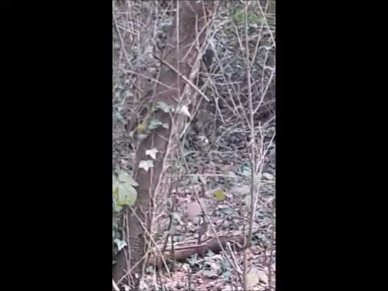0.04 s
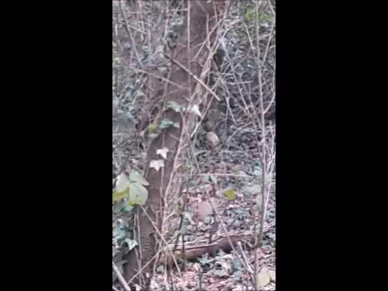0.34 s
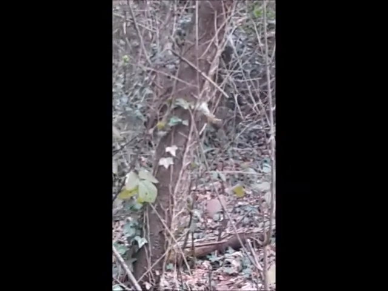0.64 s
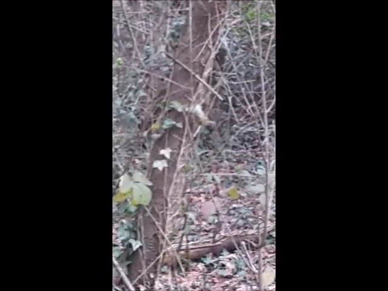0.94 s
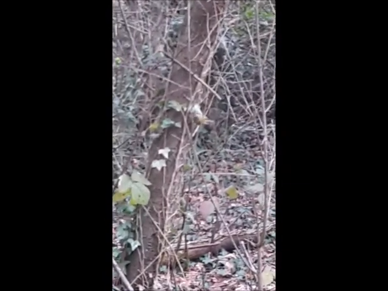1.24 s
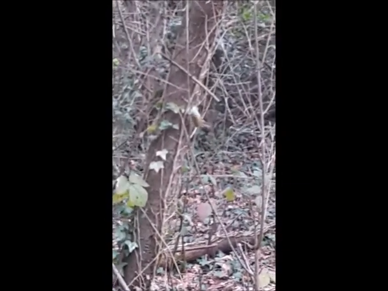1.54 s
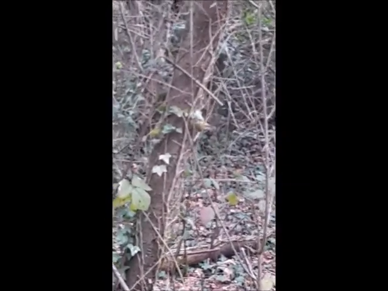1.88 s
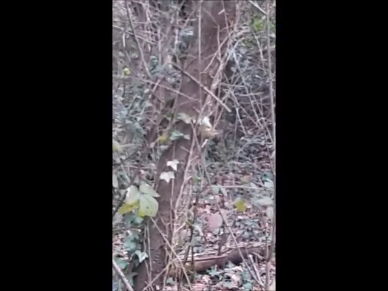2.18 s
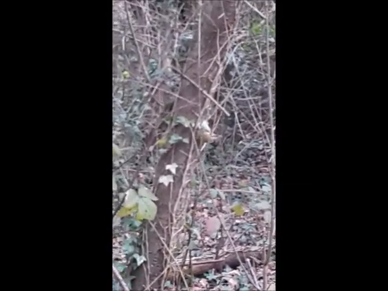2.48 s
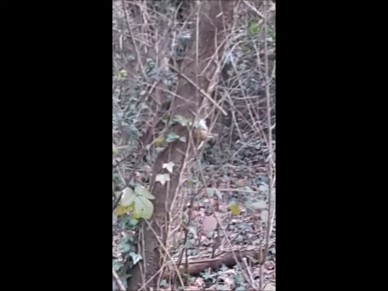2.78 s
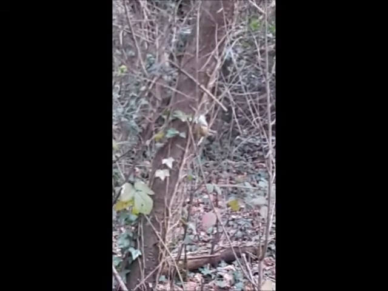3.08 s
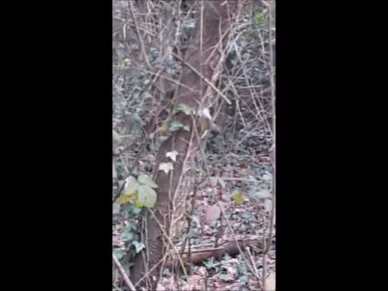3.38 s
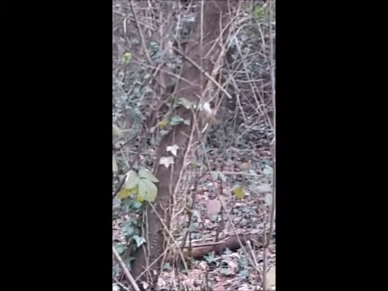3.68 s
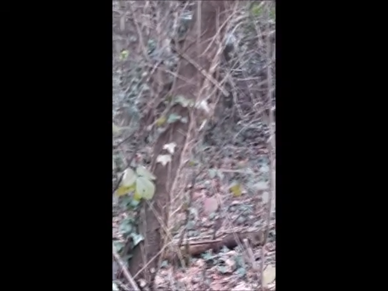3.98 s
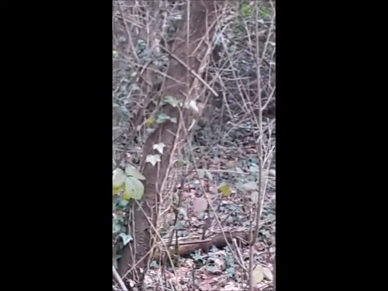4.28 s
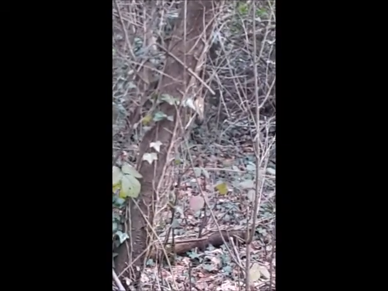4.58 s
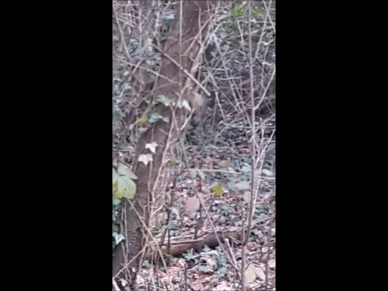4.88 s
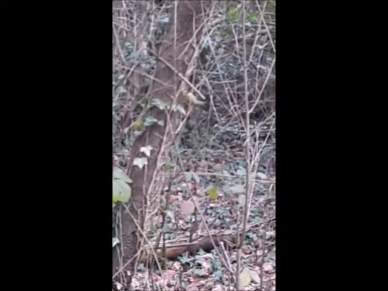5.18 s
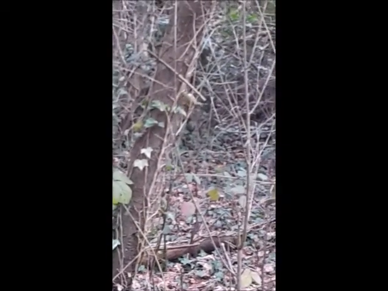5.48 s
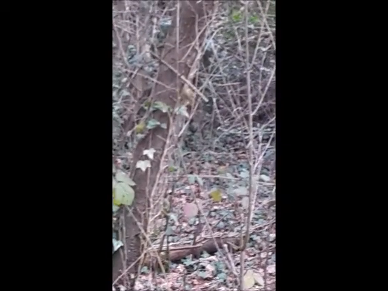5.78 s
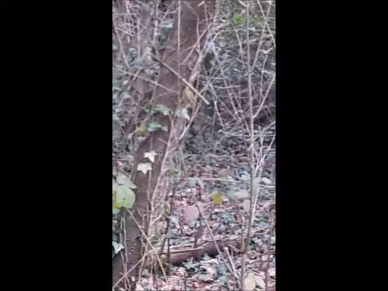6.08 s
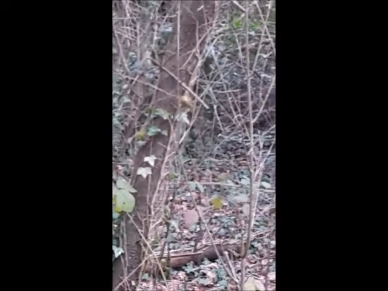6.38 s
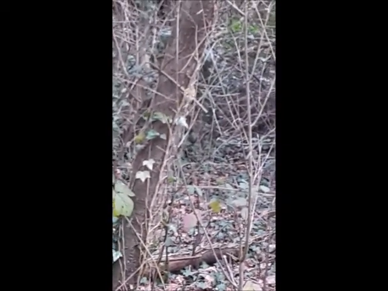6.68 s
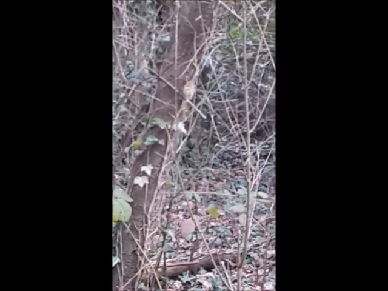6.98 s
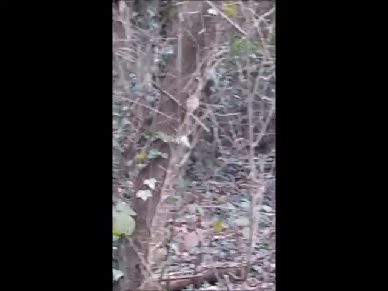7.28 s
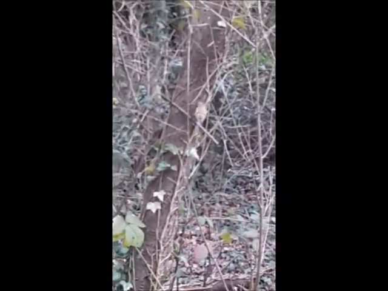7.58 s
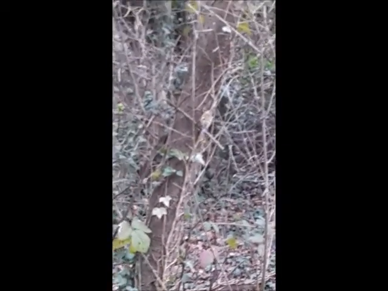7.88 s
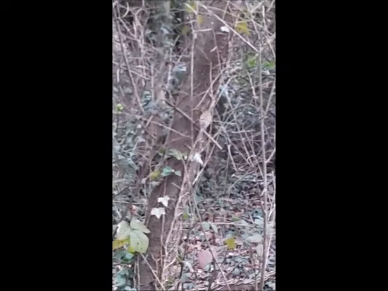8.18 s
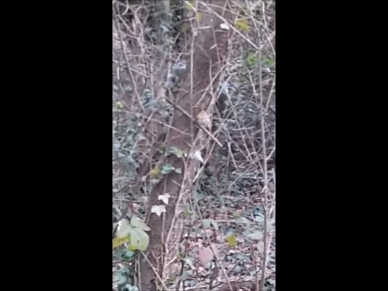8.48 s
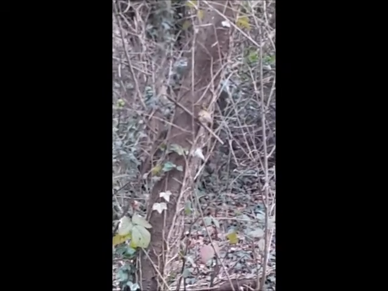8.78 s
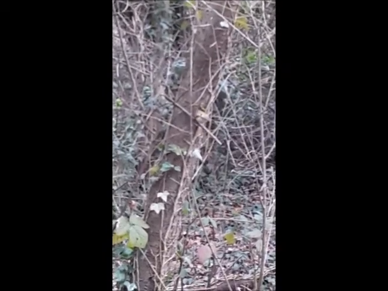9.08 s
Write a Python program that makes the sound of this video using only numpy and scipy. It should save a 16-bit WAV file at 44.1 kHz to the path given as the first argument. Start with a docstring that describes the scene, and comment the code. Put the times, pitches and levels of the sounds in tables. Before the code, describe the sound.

A few dull handling thuds hit the microphone as dry leaves and stalks crackle lightly in quiet woodland. A small bird whistles four quick, very high notes, each sliding down and echoing briefly among the trees. The rustling fades after some soft grip noise, then the bird returns with five similar notes. A low rumble, a faint far engine drone and airy hiss lie underneath.

```python
"""A quiet wood: soft air, a distant rumble and a far engine go on throughout. Early on, fingers bump
a hand-held camera near its right microphone, and dry leaves start to rustle in crisp bursts.
At 2 s a small bird gives four thin, falling whistles that scatter among the trunks. A sleeve slides
at 4 s, and the leaves settle after 5 s. Near 8 s the bird gives five more whistles and the leaves
stir again. Three faint far-off calls come along the way."""
import sys
import numpy as np
from scipy import signal
from scipy.fft import rfft, irfft
from scipy.io import wavfile
from scipy.ndimage import uniform_filter1d, map_coordinates

SR = 44100
rng = np.random.default_rng(int(sys.argv[2]) if len(sys.argv) > 2 else 0)


def pcm_store(signal):
    """Save signal as 16-bit PCM."""
    levels = np.round(np.clip(np.atleast_2d(signal), -1, 1) * 32767)
    wavfile.write(sys.argv[1], SR, levels.astype(np.int16).T)


N = 407925
TIME = np.arange(N) / SR

# The tone of the rustle. Each row: frequency in Hz, left level in dB, right level in dB.
RUSTLE_SPECTRUM = [(292, -22, -11), (880, -9.5, -8.5), (1650, -20, -21.5), (2510, -16, -19),
                   (3230, -52, -45), (3660, -22.5, -32), (4200, -24, -25), (5130, -46, -37),
                   (5700, -28, -24), (6250, -48, -45), (7580, -17.5, -20), (8170, -45, -45),
                   (9430, -16, -20), (9780, -21, -15.5), (10100, -10, -7.5), (11250, 6, -8.5),
                   (12360, -9.5, -17), (12700, -10, -3), (14500, -13, -13.5)]


def bird(turn_hz=1.2, twig_hz=5800):
    """A bird sings on the left; its echoes change as it turns its head."""
    # The treble colour of the whistles on each side: two dips and bright high peaks.
    # Each row: frequency in Hz, left dB, right dB.
    treble_colour = [(4700, -7, -7), (5500, 0, 0), (7700, 0, 0), (8400, -8, -8), (9200, 0, 0),
                     (10000, 4, -4), (11300, 7, -2), (12300, 2.5, -4), (13500, -3, -3), (13900, -3, 2),
                     (14200, 1, 12), (14500, 3, 15)]
    tone, octave, rasp = whistles()
    heading = 2 * np.pi * turn_hz * TIME
    twigs = signal.butter(4, twig_hz, "high", fs=SR, output="sos")  # twigs scatter few low pitches
    scattered = signal.sosfilt(twigs, tone + amp(-1) * octave + rasp)
    echoes = wood(scattered * np.cos(heading)) + wood(scattered * np.sin(heading))
    direct = amp(-9) * pan(db=20) * tone + amp(-8) * pan(db=9) * octave
    heard = direct + amp(-5) * pan(db=3) * echoes
    return irfft(rfft(heard) * amp(levels_at(treble_colour, np.fft.rfftfreq(N, 1 / SR))), N)


def whistles(rest_hz=5230, flick_s=.010, flick_db=-32, rasp_db=-12, waver=.006, flutter_db=2.2):
    """Each note flicks up from a resting pitch, slides down to a 'shoulder' pitch, then drops back."""
    # Each row: start in seconds, length in seconds, top pitch in Hz, shoulder pitch in Hz,
    # relative level in dB, level of the octave above in dB against the tone.
    notes = [(1.990, .062, 7900, 6750, -52.5, -16), (2.155, .065, 7400, 6540, -50, -17),
             (2.290, .076, 6940, 6020, -50, -5), (2.440, .072, 6480, 6120, -54.5, 2),
             (7.705, .061, 8000, 6950, -60, -9), (7.852, .066, 7600, 6780, -53, -9),
             (8.007, .074, 6900, 6280, -58.5, -6), (8.156, .074, 6680, 6020, -55.5, -7),
             (8.315, .075, 6950, 6080, -54.5, -4.5)]
    # Loudness through a note. Each row: share of its length, level in dB.
    note_shape = [(0, -13), (.15, -3), (.5, -1.5), (.75, -1.5), (.9, -6), (1, -16)]
    knee, sag = .72, .3  # share of the note spent sliding, and how much the slide curves
    out, pitch_drift, level_drift = np.zeros((3, N)), wander(330), wander(210)
    grit = wander(2200) + 1j * wander(2200)
    for start, length, top, shoulder, db, octave_db in notes:
        t = np.arange(-flick_s, length, 1 / SR)
        at = round(start * SR) + np.arange(len(t))
        progress, flick = np.maximum(t / length, 0), np.maximum(-t / flick_s, 0)
        slide = np.clip(1 - progress / knee, 0, 1)
        drop = np.clip((progress - knee) / (1 - knee), 0, 1)
        hz = shoulder + (top - shoulder) * slide * (1 - sag + sag * slide)
        hz = hz + (rest_hz - hz) * (flick ** 2 + drop ** 1.6)
        phase = 2 * np.pi * np.cumsum(hz * (1 + waver * pitch_drift[at])) / SR
        swell_db = 0.0115 * (7580 - top) * (progress - .5)  # lower notes swell towards their end
        shape_db = np.interp(progress, *np.transpose(note_shape))
        level = amp(db + swell_db + shape_db + flutter_db * level_drift[at])
        tone = amp(flick_db * np.sqrt(flick)) * np.exp(1j * phase)
        octave = amp(octave_db) * np.exp(2j * phase)
        rasp = amp(rasp_db) * grit[at] * (tone + octave)
        soft_ends = signal.windows.tukey(len(t), .08)
        add(out, start - flick_s, level * soft_ends * np.imag([tone, octave, rasp]))
    return out


def wood(sound, near_s=.14, far_s=.85, far_db=-19, build_s=.008, echoes_per_s=3000):
    """Near trunks send back quick echoes; the deeper wood adds faint, long ones."""
    t = np.arange(SR) / SR
    echoes = rng.standard_normal((2, SR)) * (rng.random((2, SR)) < echoes_per_s / SR)
    fade = amp(-60 * t / near_s) + amp(far_db - 60 * t / far_s)
    echoes *= (1 - np.exp(-t / build_s)) * fade
    echoes /= np.linalg.norm(echoes, axis=1, keepdims=True)
    return signal.fftconvolve(sound[None], echoes, axes=1)[:, :N]


def leaves(power, catch_per_s=170, catch_db=1.4):
    """Brushed leaves catch and slip in a crowd of crackles; hard brushes are brighter."""
    # The extra treble of a hard brush. Each row: frequency in Hz, left dB, right dB.
    fizz_spectrum = [(8900, -54, -43), (11150, 1, -22), (11800, -6, -16), (13000, -1, -1),
                     (15300, -13, -7.5)]
    body = amp(7) * colour(crackles(per_s=9700, grain_db=2), RUSTLE_SPECTRUM) * np.sqrt(power)
    fizz = amp(-51) * colour(crackles(per_s=12000, grain_db=1.5), fizz_spectrum) * power / power.max()
    return (body + fizz) * amp(-0.05 * wander(57) + catch_db * wander(catch_per_s))


def brushing(rise_s=0.01, slump_s=0.22, fade_s=0.043, light_per_s=5.6):
    """How strongly the leaves move: a slow stir, plus brushes that start fast and die away."""
    # The clearest brushes. Each row: start in seconds, length in seconds, relative level in dB.
    brushes = [(0.55, 0.017, -68), (0.945, 0.1, -75.5), (1.201, 0.067, -66), (1.459, 0.042, -66.5),
               (1.595, 0.13, -62.5), (1.798, 0.19, -67.5), (1.957, 0.12, -59.5), (2.09, 0.25, -58.5),
               (2.593, 0.044, -66), (3.118, 0.08, -78), (3.627, .015, -78), (3.955, 0.092, -71.5),
               (4.235, 0.035, -75.5), (4.342, 0.015, -63), (4.546, 0.11, -67), (4.752, .01, -71.5),
               (4.862, 0.018, -81), (4.977, 0.067, -73.5), (8.945, 0.04, -76.5), (9.086, 0.094, -69.5)]
    # The slow stir. Each row: time in seconds, relative level in dB.
    stir = [(0, -83), (1.5, -78), (2.5, -72), (3.0, -83), (3.6, -84.5), (4.6, -73), (5.6, -93.5),
            (7.6, -91), (8.5, -85), (9.25, -94)]
    light = []  # light brushes at random times, 5 dB under the stir
    for slot, (delay, span) in enumerate(rng.random((200, 2))):
        start = (slot + delay) / light_per_s
        if start < TIME[-1]:
            light.append((start, 0.024 * (.5 + span), np.interp(start, *np.transpose(stir)) - 5))
    power, age = follow(stir) ** 2, np.arange(SR) / SR
    for start, length, db in brushes + light:
        fade = np.exp(-age / slump_s - np.maximum(age - length, 0) / fade_s)
        add(power, start, amp(db) ** 2 * (1 - np.exp(-age / rise_s)) * fade)
    return power


def snaps(decay_s=0.0018):
    """Dry stalks break with tiny cracks, brighter than a brush."""
    # Each row: start in seconds, level in dB, how much louder the left side is in dB.
    breaks = [(1.467, -56.5, 6.5), (1.863, -56, 5.5), (1.96, -50, 6), (2.1756, -46, 6), (2.604, -55, 6),
              (3.648, -59, 1), (4.164, -51, -4), (8.572, -65, -1.5), (8.592, -67, 3)]
    out, t = np.zeros((2, N)), np.arange(SR // 100) / SR
    bright = unit(np.diff(noise(RUSTLE_SPECTRUM), n=2))
    for start, db, side_db in breaks:
        crack = bright[:, round(start * SR):][:, :len(t)] * np.exp(-t / decay_s)
        add(out, start, amp(db) * pan(side_db) * crack)
    return out


def scrapes():
    """Stalks rub together in short swells of dull crackles."""
    # Each row: middle in seconds, width in seconds (its sign does not matter), level in dB.
    rubs = [(.74, -0.4, -82.5), (1.23, 0.2, -83), (1.48, -0.2, -86), (1.63, 0.3, -87), (2.3, -0.63, -84),
            (4.39, 0.4, -83.5), (4.61, 0.25, -85.5), (4.8, 0.4, -89), (5.45, 1.3, -89)]
    # The tone of the stalks. Each row: frequency in Hz, left dB, right dB.
    spectrum = [(2800, -28, -34), (3400, -4, -3), (3900, 2, -3), (4600, -7, -10), (5400, -24, -25),
                (8000, -40, -40)]
    level = sum(amp(db) * np.exp(-(2 * (TIME - middle) / width) ** 2) for middle, width, db in rubs)
    return colour(crackles(per_s=2500, grain_db=1), spectrum) * level


def litter(power, smooth_s=0.43):
    """The forest floor shifts with a dull, patchy crackle while the leaves move."""
    # Each row: frequency in Hz, level in dB.
    spectrum = [(1500, -19), (2400, 15.5), (3200, 1), (3900, 8.5), (4700, -10), (5800, 5.5), (7000, -33),
                (9000, -16)]
    slow = abs(uniform_filter1d(power, round(smooth_s * SR)))
    level = amp(-83.5) * np.sqrt(slow / (slow + amp(-88) ** 2))  # follows the leaves up to a ceiling
    return colour(crackles(per_s=3000, grain_db=4), spectrum) * level * amp(2 * wander(6.5))


def bumps(low_cut_hz=90):
    """Fingers push the camera: the microphone's bass cut makes each push a thud, and the case ticks."""
    # Each row: time in seconds, peak in dB, rise in seconds, release in seconds,
    # press (1) or let go (-1), share reaching the left microphone.
    touches = [(0.2611, -22.5, 0.00049, 0.0017, -1, -0.1), (.629, -11.5, 0.00026, 0.0014, -1, -0.087),
               (0.6493, -31.5, 0.0006, 0.0018, -1, -0.13), (1.6676, -25, 0.00053, 0.00057, 1, -.14),
               (2.4607, -13.5, 0.00045, 0.0016, -1, -0.079), (2.8799, -29, 0.00022, 0.0011, 1, -0.12),
               (4.5672, -31, 0.0015, 0.0019, 1, 0.26)]
    # The ringing case. Each row: pitch in Hz, level in dB against the thud, decay in seconds.
    case = [(850, -37, .0016), (2100, -36.5, .0007)]
    out, t = np.zeros((2, N)), np.arange(-SR // 10, SR // 10) / SR
    low_cut = signal.butter(3, low_cut_hz, "high", fs=SR, output="sos")
    tick = (t > 0) * sum(amp(db) * np.exp(-abs(t) / decay) * np.sin(2 * np.pi * hz * t)
                         for hz, db, decay in case)
    for when, db, rise, release, direction, left in touches:
        push = np.exp(-np.logaddexp(0, -t / rise) - np.logaddexp(0, t / release - 1))
        thud = signal.sosfilt(low_cut, push)
        knock = thud / abs(thud).max() + tick
        add(out, when + t[0], np.array([[left], [1]]) * direction * amp(db) * knock)
    return out


def handling(slide_at_s=4.01, fade_db_per_s=99):
    """The shifting grip makes a lumpy murmur; one soft slide of a sleeve swells and fades."""
    # The tones of grip and sleeve. Each row: frequency in Hz, level in dB.
    grip_spectrum = [(50, -20), (85, 11), (115, 5), (160, -2), (230, -28.5), (400, -25.5), (900, -64)]
    sleeve_spectrum = [(150, -28), (330, 9), (500, 0), (800, -6.5), (1300, -28), (2500, -50)]
    # Each row: time in seconds, level in dB.
    grip_level = [(0, -75.5), (2.6, -58.5), (3.3, -52.5), (4.6, -56), (5.4, -60.5)]
    grip = noise(grip_spectrum) * follow(grip_level) * amp(1.3 * wander(25))
    sleeve = noise(sleeve_spectrum) * amp(-59 - fade_db_per_s * abs(TIME - slide_at_s))
    return grip + sleeve


def far_birds(waver=0.024):
    """Birds deeper in the wood give short husky glides, mostly lost in their echoes."""
    # Each row: start in seconds, length in seconds, first and last pitch in Hz, relative level in dB.
    calls = [(1.325, 0.066, 5850, 5600, -78), (1.57, 0.066, 7500, 6930, -68),
             (5.12, .066, 3400, 4150, -72.5)]
    song, drift = np.zeros(N), wander(600)
    for start, length, from_hz, to_hz, db in calls:
        hz = np.linspace(from_hz, to_hz, round(length * SR))
        hz *= 1 + waver * drift[round(start * SR):][:len(hz)]
        add(song, start, amp(db) * np.hanning(len(hz)) * np.sin(2 * np.pi * np.cumsum(hz) / SR))
    return pan(db=5) * (amp(-11) * song + amp(-8) * wood(song))


def background():
    """A distant rumble, a far engine's drone, soft airy noise and a thin high hiss."""
    # Low rumble, then airy noise and high hiss with a dip near 8 kHz. Each row: frequency in Hz, left dB, right
    # dB.
    rumble_spectrum = [(19.5, -38, -37), (31, -10.5, -16), (48, -14, -6.5), (63, 2, 1), (96, -3.5, -5.5),
                       (135, -9.5, -7.5), (199, -13.5, -13.5), (338, -25, -25), (572, -26.5, -47),
                       (1480, -77, -99)]
    air_spectrum = [(99, -8, -5), (277, 3.5, 3), (499, -4, -2), (754, -4, -2.5), (1117, -16.5, -15.5),
                    (1720, -25, -25.5), (2230, -16, -17.5), (2620, -19, -19.5), (3230, -31, -36),
                    (3760, -31, -32), (4750, -26, -27.5), (6400, -69, -44.5), (9000, -31, -34.5)]
    hiss_spectrum = [(3040, -59, -42), (7900, 0.5, 0.5), (8060, -44, -20), (9720, -21, -7), (9940, -7, 15),
                     (10330, -5, 13), (10600, -9, -1), (11900, -11, -1), (12000, -19, 1), (14700, 2, 1.5)]
    # The engine's tone. Each row: frequency in Hz, level in dB.
    drone_spectrum = [(45, -28), (62, -4), (73, 11), (82, 3), (95, -26.5), (140, -51)]
    # Slow changes in loudness. Each row: time in seconds, relative level in dB.
    rumble_level = [(0, -51.5), (1.0, -53.5), (2.9, -52.5), (3.8, -50), (5.3, -54), (7.2, -54),
                    (8.0, -57.5), (9.25, -53)]
    drone_level = [(0, -70.5), (7, -64.5), (9.25, -65)]
    air_level = [(0, -65.5), (1.9, -65.5), (2.4, -63), (4.4, -66), (6.2, -68), (9.25, -66.5)]
    rumble = amp(-1) * noise(rumble_spectrum) * follow(rumble_level) * amp(wander(13))
    drone = noise(drone_spectrum) * follow(drone_level)
    sway = amp(.6 * wander(5))
    air = amp(2) * noise(air_spectrum) * follow(air_level) * sway
    return rumble + drone + air + amp(-80.5) * noise(hiss_spectrum)


def crackles(per_s, grain_db):
    """A crowd of tiny clicks, a few of them large."""
    sizes = amp(grain_db * np.minimum(rng.exponential(1, (2, N)), 5))
    return rng.standard_normal((2, N)) * sizes * (rng.random((2, N)) < per_s / SR)


def noise(spectrum):
    """Steady stereo noise with the given tone."""
    return colour(rng.standard_normal((2, N)), spectrum)


def colour(pair, spectrum):
    """Gives two unrelated signals a tone; long waves reach both microphones alike."""
    # Each row: frequency in Hz, how alike the two sides are from 0 to 1.
    likeness = [(60, 1), (130, 0.92), (290, 0.14), (640, 0.72), (1400, 0.025), (3000, 0)]
    hz, (left, right) = np.fft.rfftfreq(N, 1 / SR), rfft(pair)
    same = np.clip(levels_at(likeness, hz)[0], -1, 1)
    right = same * left + np.sqrt(1 - same ** 2) * right
    return unit(irfft(np.array([left, right]) * amp(levels_at(spectrum, hz)), N))


def wander(rate):
    """A smooth random curve through `rate` points a second."""
    return map_coordinates(rng.standard_normal(4096), [TIME * rate], order=3, mode="wrap")


def levels_at(table, hz):
    """Fills in a table's values between its frequencies."""
    row_hz, *columns = np.transpose(table)
    return np.array([np.interp(np.log(hz + 1), np.log(row_hz + 1), column) for column in columns])


def follow(curve):
    """A gain for every sample, from rows of seconds and dB."""
    return amp(np.interp(TIME, *np.transpose(curve)))


def amp(db):
    """Turns decibels into a gain."""
    return 10 ** (np.asarray(db) / 20)


def unit(x):
    """Scales a signal to an average power of 1."""
    return x / np.sqrt(np.mean(x ** 2) + 1e-20)


def pan(db):
    """Makes the left side `db` louder than the right."""
    return amp([[db / 2], [-db / 2]])


def add(mix, start_s, sound):
    """Mixes a sound in at the given time."""
    part = mix[..., round(start_s * SR):][..., :sound.shape[-1]]
    part += sound[..., :part.shape[-1]]


def scene():
    """Birds, leaves, the hand on the camera and the wood's background."""
    power = brushing()
    birds = bird() + far_birds()
    rustle = leaves(power) + snaps() + scrapes() + litter(power)
    return birds + rustle + bumps() + handling() + background()


def record(dry, edge_hz=14700):
    """Cuts off the highest treble."""
    taps = signal.firwin(511, edge_hz, window=("kaiser", 8), fs=SR)
    return signal.oaconvolve(dry, taps[None], "same", axes=1)


dry = scene()
out = record(dry)
pcm_store(out)
```